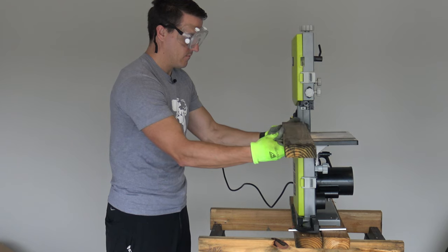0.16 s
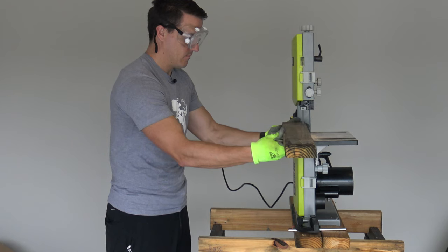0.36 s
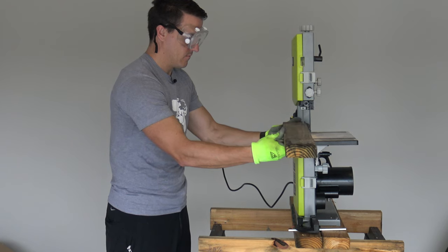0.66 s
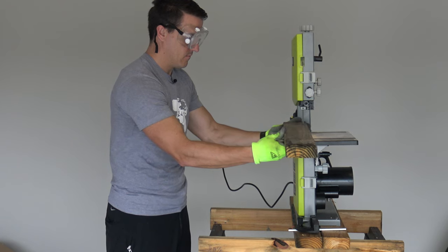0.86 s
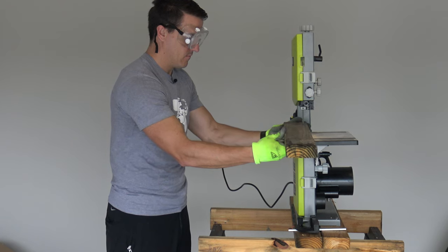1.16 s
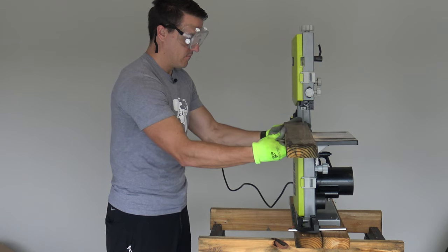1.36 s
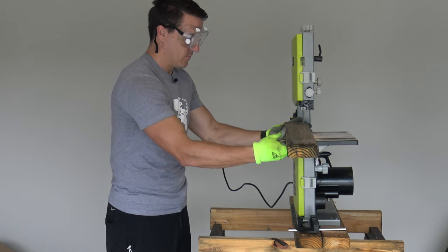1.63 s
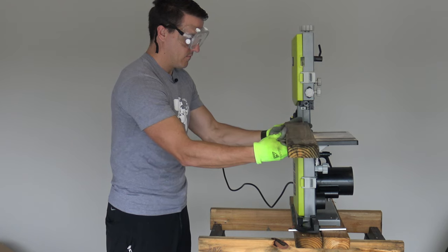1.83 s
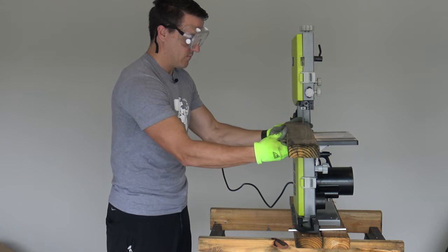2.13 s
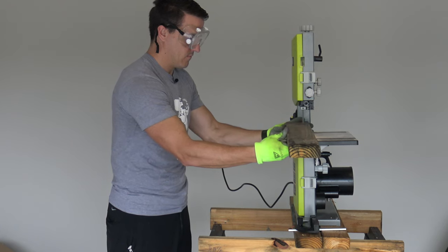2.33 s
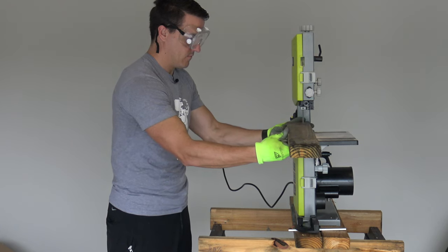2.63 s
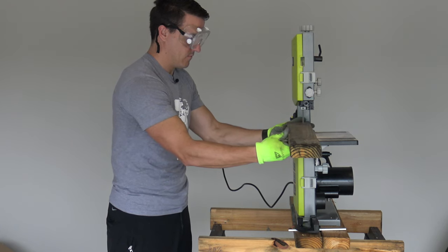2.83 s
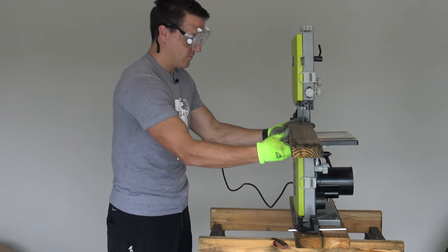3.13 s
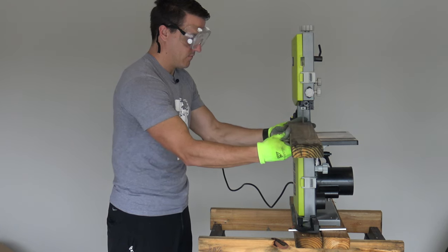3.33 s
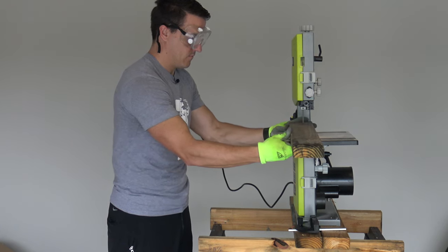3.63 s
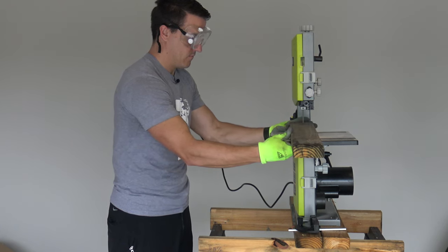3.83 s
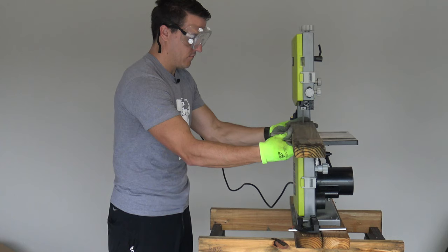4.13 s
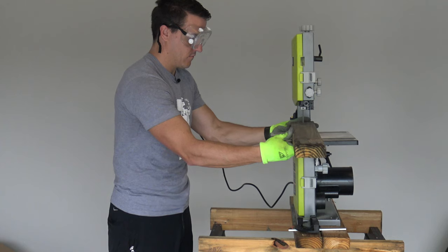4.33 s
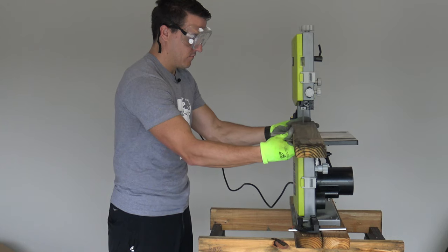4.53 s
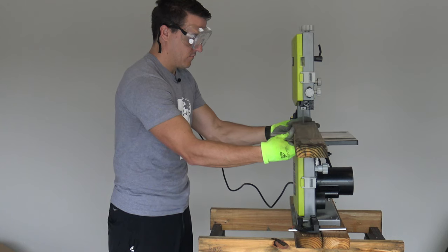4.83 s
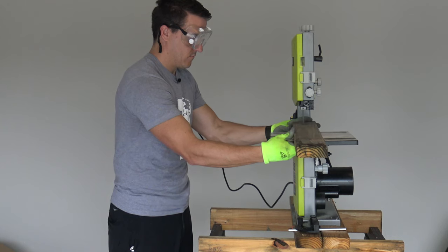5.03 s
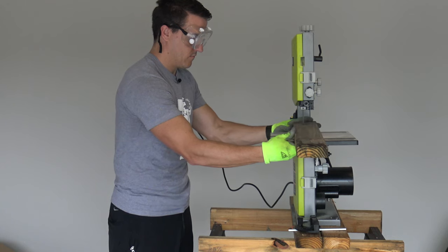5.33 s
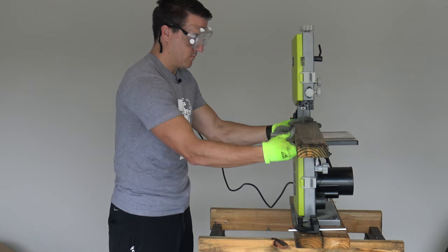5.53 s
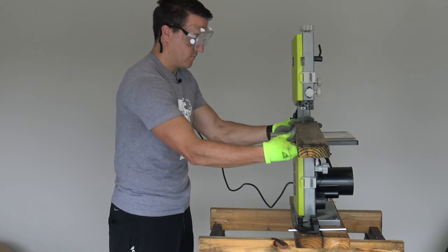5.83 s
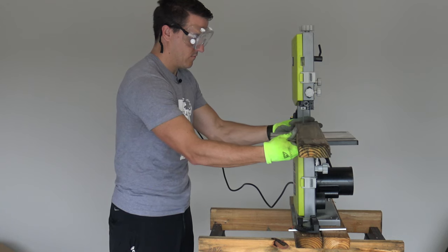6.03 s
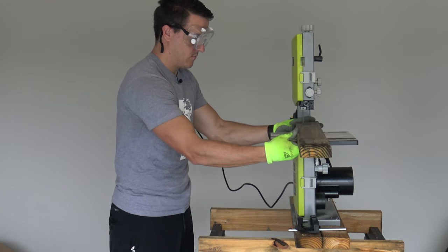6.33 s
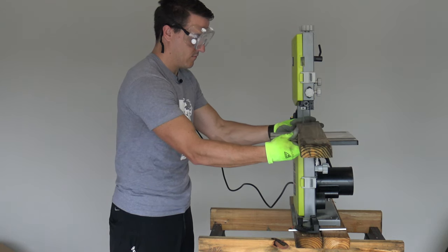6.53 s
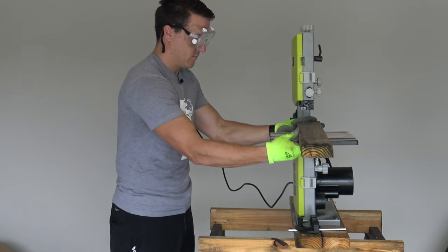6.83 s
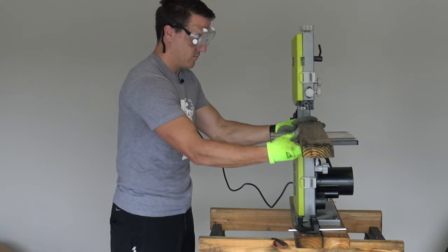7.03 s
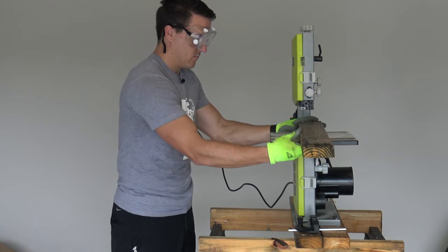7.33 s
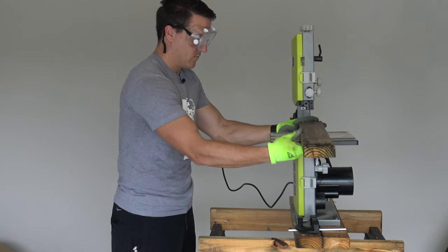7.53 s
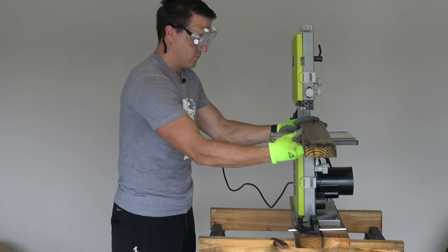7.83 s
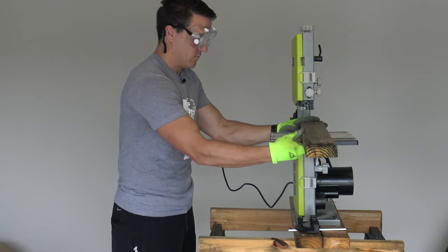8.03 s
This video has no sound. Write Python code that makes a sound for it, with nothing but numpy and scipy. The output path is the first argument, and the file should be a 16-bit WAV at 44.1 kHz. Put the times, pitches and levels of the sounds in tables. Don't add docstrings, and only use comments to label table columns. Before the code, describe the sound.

A small electric band saw is already cutting a thick plank at the start. A nasal, throbbing buzz of wood and a higher whine ride over a steady motor hum and a wide hiss of chips. Frequent shrill blade squeals fill the first two seconds, then thin out; the cut softens, with low wooden barks returning after six seconds. Close single microphone, bare room, short faint echo, same in both channels.

```python
import sys
import numpy as np
from scipy import signal
from scipy.fft import rfft, irfft
from scipy.io import wavfile

SR = 44100
rng = np.random.default_rng(int(sys.argv[2]) if len(sys.argv) > 2 else 0)


def file_out(sig):
    cols = np.atleast_2d(sig).T
    lim = np.clip(cols, -1, 1)
    pcm = np.round(lim * 32767).astype(np.int16)
    wavfile.write(sys.argv[1], SR, pcm)


def nominal_scale(level):
    x = np.asarray(level, float) / 20
    return 10 ** x


N = 360297
T = np.arange(N) / SR


def level(x, db):
    return x * nominal_scale(db) / np.sqrt(np.mean(x ** 2))


def curves(table):
    s, *columns = np.transpose(table)
    return [np.interp(T, s, c) for c in columns]


def bumps(events):
    t = T[::128]
    total_db = 0 * t
    for centre_s, length_s, db in events:
        total_db = total_db + db * np.exp(-((t - centre_s) / max(length_s, .01)) ** 2)
    return np.interp(T, t, total_db)


def walk(rate_hz):
    knots = rng.standard_normal(int(N / SR * 80) + 4)
    return 0.8 * np.interp(T * min(rate_hz, 80), np.arange(len(knots)), knots)


def ring(x, modes, flicker_db, rate_hz):
    out = np.zeros(N)
    for i, (hz, width_hz, db) in enumerate(modes):
        b, a = signal.iirpeak(hz, hz / (1.5 * max(width_hz, 5)), fs=SR)
        rung = signal.sosfilt([np.r_[b, a]] * 2, x)
        out += (-1) ** i * rung * nominal_scale(db + flicker_db * walk(rate_hz))
    return level(out, 0)


def colour(x, points):
    hz, db = np.transpose(points)
    f = np.arange(N // 2 + 1) * SR / N + 1
    return irfft(rfft(x) * nominal_scale(np.interp(np.log(f), np.log(hz), db)), N)


# multiple, level_db
SHAFT_MULTIPLES = [(5, -37.5), (6, -52), (7, -32.5), (8, -39), (9, -24.5), (10, -26.5), (11, -26),
                   (12, -58), (13, -10), (14, -9.5), (15, -3), (16, -42.5), (17, -9), (18, -11.5),
                   (19, -40.5), (20, -5.5), (21, 6), (22, -29), (23, -2.5), (24, -14), (25, -9), (26, -30),
                   (27, -29), (28, -9), (29, -3.5), (30, -20), (31, -13), (32, -15), (37, -12), (39, -12),
                   (43, -5), (48, -5), (55, -9)]


def motor(turns, hum_db):
    knock_turn, spread, bass_lag = .42, .3, .009
    top_db = dict(SHAFT_MULTIPLES)[21]
    out = np.zeros(N)
    for k, db in SHAFT_MULTIPLES:
        cycles = k * (turns - knock_turn) + spread * rng.random()
        cycles = cycles + bass_lag * min(k - 26, 0) ** 2 + 0.011 * walk(3.07)
        out += nominal_scale(db - top_db) * (1 + 0.19 * walk(7)) * np.sin(2 * np.pi * cycles)
    return np.sqrt(2) * nominal_scale(hum_db) * out


# time_s, level_db
FEED = [(0.0, -49.5), (0.04, -55), (0.43, -56), (1.07, -55.5), (1.34, -57), (1.71, -56), (1.77, -56.5),
        (3.77, -58.5), (4.19, -60), (4.32, -57), (5.05, -59), (5.19, -57), (5.69, -59.5), (7.37, -60),
        (7.6, -58.5), (8.17, -59)]
# time_s, level_db
BITE = [(0.0, -40.5), (0.48, -41.5), (0.59, -36.5), (1.02, -43), (1.43, -43.5), (1.55, -40.5), (1.77, -46),
        (1.84, -42), (1.95, -43.5), (2.18, -39.5), (2.23, -41), (2.68, -46), (3.12, -41), (3.18, -43.5),
        (5.03, -46.5), (5.44, -44.5), (5.6, -46.5), (8.17, -54)]
# time_s, level_db
CHATTER = [(0.0, -47), (0.11, -42), (1.73, -45.5), (2.77, -50), (3.41, -48), (3.5, -53), (3.55, -47),
           (4.19, -52.5), (4.35, -46), (5.69, -43), (6.24, -44), (6.28, -39), (6.62, -44.5), (7.05, -32.5),
           (7.17, -44), (8.17, -54.5)]
USUAL_DB = (-58, -45, -46)
# centre_s, length_s, change_db
PUSH = [(.09, 0.027, -1), (.17, 0.068, 1), (.48, 0.087, -1), (.6, 0.036, 0.5), (1.41, 0.055, -1),
        (1.52, 0.032, 1), (2.16, 0.069, 0.5), (2.76, .05, 0), (3.0, .04, 0.5), (4.36, 0.069, -1),
        (5.16, 0.012, -0.5), (6.9, 0.033, 0.5), (7.2, 0.059, -0.5), (7.58, 0.056, 0)]
# level_db, then shares of feed, bite and chatter, lean_db, drift_db_per_s as the cut deepens
PARTS = dict(low_modes=(-47.5, -0.4, 0.44, 0.11, 2, 0.02), main_modes=(-41, 1, -0.62, 0.5, -5, -0.54),
         upper_modes=(-49, 1.6, -0.44, 0.51, -3, 0), whine=(-42.5, .7, .1, -.45, 0, -1.5),
         low_ring=(-46.5, 1, 0.1, -0.18, 2, .5), middle_ring=(-49, 0, 0.51, 0.04, 5, -2.3),
         high_ring=(-43, 0.97, 1.25, 0.29, -2, 1), rasp=(-55, 1.91, 0.153, 0.1935, -0.1, 0.81),
         upper_guide=(-56.5, 1.39, -0.4, -0.32, 2, -0.46), lower_guide=(-76, -0.8, -0.96, -0.1, 8.5, -1.5))
# centre_s, length_s, change_db
SPELLS = dict(low_ring=[(1.11, 0.13, 9), (2.55, .15, 1), (3.1, 0.56, -3), (4.3, .06, -3), (4.66, 0.052, 3),
          (5.3, 0.39, 5.5), (6.5, 0.46, 2.5), (7.66, 0.2, 2.5), (7.95, 0.1, -8)],
          upper_guide=[(.2, 0.12, 2), (.4, 0.068, 3.5), (.62, 0.083, 3.5), (.95, 0.1, 1), (1.6, 0.13, 2),
          (5.3, .15, 2)], lower_guide=[(2.12, .2, 8), (3.58, .06, 6), (4.95, 0.18, 0), (6.92, .06, 4)],
          upper_modes=[(2.97, 0.26, 3), (6.14, 0.46, 6.5), (2.4, 0.069, 2)], low_modes=[(.5, 0.067, 2),
          (4.45, 0.16, 5.5), (4.85, 0.032, 9), (5.3, 0.06, -1), (6.38, .08, 4)],
          middle_ring=[(.1, 0.22, 5.5), (.35, 0.05, 3), (1.63, 0.039, 0), (2.64, .05, 0)],
          main_modes=[(.6, 0.076, 6), (4.9, 0.029, 4), (6.56, 0.043, 3), (6.74, 0.046, 0),
          (6.97, 0.03, 1.5), (7.02, .02, 1), (.52, 0.036, -6), (7.65, 0.075, 6.5)],
          high_ring=[(.97, 0.043, 8), (1.22, .04, 0), (6.4, .25, -1), (6.9, 0.082, -3.5), (7.8, .15, -4)])


def part_db(name, stray_db):
    feed, bite, chatter = (curves(c)[0] - db for c, db in zip((FEED, BITE, CHATTER), USUAL_DB))
    lean = np.interp(T, 4.13 + np.cumsum([0, 0.15, 1, 1]), [0, 1, 1, 0])
    db, of_feed, of_bite, of_chatter, lean_db, drift = PARTS[name]
    out = db + of_feed * (feed + bumps(PUSH)) + of_bite * bite + of_chatter * chatter
    out = out + lean_db * lean + drift * (T - T[-1] / 2)
    return out + bumps(SPELLS.get(name, [])) + stray_db * walk(6.4)


def throb(turns, lap_db, shaft_db, roller_db):
    lap = 2 * np.pi * 8.0 * T - 2.3
    shaft = 2 * np.pi * turns + .3
    roller = 2 * np.pi * 56.4 * T
    return nominal_scale(lap_db * np.cos(lap) + shaft_db * np.cos(shaft) + roller_db * np.cos(roller))


def bites(teeth, scatter_db, dust):
    out = dust * rng.standard_normal(N)
    at = np.flatnonzero(np.diff(np.floor(teeth)))
    chance = rng.standard_normal((len(at) + 200, 2))[:len(at)]
    out[at] += 6 * chance[:, 0] * nominal_scale(scatter_db * chance[:, 1])
    return level(out, 0)


# pitch_hz, width_hz, level_db
PLANK = [
    [(738, 22, 0), (768, 22, -1), (803, 22, -1), (822, 20, -5)],
    [(846, 24, 0), (876, 22, 0)],
    [(968, 14, 0), (1016, 24, -7), (935, 30, -10)],
]


def plank(bite, gains, turns):
    wood = sum(gain * ring(bite, modes, .8, 25) for gain, modes in zip(gains, PLANK))
    return nominal_scale(-3.0) * wood * throb(turns, 1.3, 1.2, .4)


# pitch_hz, width_hz, level_db
BLADE = [
    [(3850, 30, 2), (3910, 44, 0), (3990, 50, -4)],
    [(4250, 60, -1), (4320, 50, 0), (4380, 20, 2), (4490, 90, 0)],
    [(4645, 40, 2), (4705, 50, 2), (4790, 50, -1), (4940, 36, 2), (4995, 36, -4)],
]
# pitch_hz, width_hz, level_db
SING = [(4768, 8, 5), (4808, 24, 1), (4950, 50, -4)]


def blade(bite, gains, sing, turns):
    steel = sum(gain * nominal_scale(-2) * ring(bite, modes, 2, 50) for gain, modes in zip(gains, BLADE))
    steel += nominal_scale(0.5) * sing * ring(bite, SING, 1.3, 45)
    return nominal_scale(-4.5) * steel * throb(turns, 2.2, .8, .3)


WHINE_DB = [-10, -6, -18.5, -6, -6]


def tooth_whine(bite, whine, carriers, turns, teeth):
    out = nominal_scale(-8) * whine * ring(bite, [(1922, 36, 0), (1860, 50, -11), (2000, 60, -7)], 1.5, 30)
    pressure = throb(turns, 3.2, 1.8, 1.3)
    spacing = .07 * walk(60) + .085 * walk(16)
    for k, (carrier, db) in enumerate(zip(carriers, WHINE_DB), 1):
        gain = carrier * nominal_scale(db + 1.5 * walk(9) + 1.5 * walk(35))
        out += gain * pressure * np.sin(2 * np.pi * (k * teeth + spacing))
    return out


# centre_s, length_s, change_db
BLOOM = [(0, 0.017, 9), (.07, 0.036, -6), (.42, 0.068, -1), (.6, 0.044, 5.5), (1.2, 0.28, -1),
         (1.68, 0.081, 6), (2.06, 0.077, 2.5), (2.4, 0.034, 3), (2.64, 0.099, 3), (2.95, 0.2, 2),
         (3.85, 0.25, -1), (3.22, 0.27, 3), (3.5, 0.037, -3.5), (4.68, 0.19, 3.5), (5.04, 0.072, 0),
         (5.35, 0.23, 6), (6.6, 0.19, 6), (6.95, 0.11, -4), (7.44, 0.046, 8.5), (7.68, 0.11, 5),
         (8.12, 0.083, 6)]


def cutting(turns, teeth):
    board = [nominal_scale(part_db(name, 0.96)) for name in ("low_modes", "main_modes", "upper_modes")]
    steel = [nominal_scale(part_db(name, 0.29)) for name in ("low_ring", "middle_ring", "high_ring")]
    whine = nominal_scale(part_db("whine", 0.53) + bumps(BLOOM))
    sing = steel[2] * np.clip(steel[2] / nominal_scale(-43.5), .05, 1)
    bite = bites(teeth, scatter_db=0.5, dust=0.31)
    carriers = [board[2], whine, np.sqrt(whine * steel[0]), steel[0], sing]
    out = plank(bite, board, turns) + blade(bite, steel, sing, turns)
    return out + tooth_whine(bite, whine, carriers, turns, teeth)


# pitch_hz, level_db per Hz
CHIP_SPECTRUM = [(20, -42), (60, -37), (190, -11.5), (230, -9.5), (500, -2), (1130, -1.5), (1800, -1),
                 (2750, -5), (4600, -2), (5200, -6.5), (7900, -16.5), (10200, -13.5), (13200, -25),
                 (15700, -31)]


def chip_hiss(chips, feed_db):
    return nominal_scale(feed_db + 13.0) * level(colour(chips, CHIP_SPECTRUM), 0)


FRAME_HZ = [625, 1110, 1180, 1330, 1388, 1442, 1610, 1745, 1975, 2075, 2305, 2620, 2894, 3210, 3450, 5650,
            5820, 6185, 6350, 6750, 7320, 10500]
# width_hz, level_db
FRAME_MODES = [(19.8, -5.5), (20, -32), (34.8, -13.5), (25, -2.5), (20.6, -9), (19.7, -0.5), (74, -6),
               (83, -2), (49.3, -6.5), (40, -24), (45, -8.5), (90, -12.5), (10, 0), (60, -15), (85.6, -8.5),
               (220, -8.5), (200, -7.5), (70, -39), (239, -12.5), (112, -15.5), (226, -21.5), (150, -36)]


def frame(scrape, feed_db):
    modes = [(hz, *mode) for hz, mode in zip(FRAME_HZ, FRAME_MODES)]
    return nominal_scale(feed_db + 11) * ring(scrape, modes, 1.6, 7)


# pitch_hz, width_hz, level_db
GUIDES = [
    [(11020, 90, -5), (11350, 200, -8), (11610, 110, 1), (11990, 140, 0)],
    [(14380, 240, 0), (14750, 300, -5), (15250, 340, -5)],
]


def guides(scrape):
    upper_db, lower_db = part_db("upper_guide", 0.18), part_db("lower_guide", .6)
    upper = nominal_scale(2.2 * (upper_db + 53) - 60) * ring(scrape, GUIDES[0], 4.5, 40)
    lower = nominal_scale(1.6 * (lower_db + 67.5) - 63) * ring(scrape, GUIDES[1], 4.5, 40)
    return upper + lower


def catches(events, swell_s, db, late_s=0.0):
    t = np.arange(-.015, .05, 1 / SR)
    bell = np.exp(-(t / (swell_s * np.where(t < 0, .75, 1.3))) ** 2)
    tail = (t > 0) * 0.59 * np.exp(-t / (3 * swell_s))
    shape = np.maximum(bell, tail)
    out = np.zeros(N + len(t))
    for s, peak_db, hz in events:
        i = int((s + late_s + t[0]) * SR)
        out[i:i + len(t)] += nominal_scale(peak_db + db) * shape * np.sin(2 * np.pi * hz * t)
    return out[:N]


# peak_s, peak_db, pitch_hz
PLANK_CATCH = [(0.185, -27, 840), (0.217, -27, 850), (0.335, -25, 863), (0.358, -25, 860),
               (0.586, -38, 835), (0.645, -30, 885), (0.68, -34, 840.0), (0.726, -35, 830),
               (0.882, -28, 858), (1.01, -31, 825), (1.078, -24, 850), (1.117, -31, 875), (1.419, -29, 820),
               (1.49, -22.5, 842), (1.545, -26.5, 833), (1.666, -24, 857), (2.453, -32, 886),
               (2.965, -33, 816), (3.104, -30.5, 825), (3.19, -30, 842), (3.317, -29, 845),
               (3.396, -38, 860), (3.733, -27, 850), (4.392, -32, 860), (4.638, -29, 850),
               (4.891, -26, 830), (4.903, -30, 750), (5.18, -30, 836), (5.329, -32, 850),
               (6.121, -28.5, 884), (6.166, -30, 880), (6.247, -26, 900), (6.28, -23, 890),
               (6.291, -30, 904), (6.305, -22, 854), (6.354, -27, 877), (6.379, -28.7, 847),
               (6.445, -25, 790), (6.463, -23, 851), (6.64, -26.5, 886), (6.82, -21.5, 870),
               (6.89, -23.5, 864), (6.913, -39, 860), (6.929, -28.5, 880), (7.062, -19.5, 860),
               (7.125, -25, 880.0), (7.299, -28.5, 892), (7.536, -36, 880), (7.846, -27, 890.0),
               (7.896, -34, 815)]
# peak_s, peak_db, pitch_hz
BLADE_CATCH = [(0.178, -34, 3900), (0.187, -35, 4000), (0.351, -35.4, 3950), (0.643, -34, 3900),
               (0.669, -26.5, 3890), (0.689, -44, 3840), (1.029, -37, 4050), (1.058, -37, 3910.0),
               (1.073, -40, 3920), (1.086, -29, 3880.0), (1.098, -30, 3860), (1.113, -40, 3750),
               (1.154, -40, 3920), (1.169, -33.5, 3800), (1.634, -36.1, 3750), (1.655, -35.6, 3850),
               (1.998, -34.5, 3950), (2.181, -31, 3870), (2.425, -29, 3890), (2.54, -38, 3900),
               (2.622, -35, 3860), (2.748, -34, 3900), (4.243, -31, 3900), (4.262, -31.5, 3820),
               (4.31, -25, 3860), (4.37, -32, 3930), (4.527, -37, 3880), (4.668, -29, 3860),
               (5.234, -41, 3930), (5.358, -30.5, 3900), (5.44, -32.5, 3860.0), (6.019, -37, 4070),
               (7.568, -46, 3920), (7.2, -43, 4660), (7.627, -34.7, 3980), (7.676, -52, 3820),
               (7.783, -48, 3800)]
# peak_s, peak_db, pitch_hz
SIDE_CATCH = [(0.055, -30, 4360), (0.12, -30, 4320), (0.129, -26.5, 4260), (0.295, -34, 4470),
              (0.348, -31, 4340), (0.425, -39, 4400), (0.638, -32, 4380.0), (0.684, -38, 4460),
              (0.781, -32.7, 4530), (1.005, -33.6, 4360), (1.06, -36, 4300), (1.618, -31, 4360),
              (1.634, -37, 4400), (1.646, -31, 4450), (2.615, -33, 4330.0), (2.671, -33, 4400)]
# peak_s, peak_db, pitch_hz
SQUEAL = [(0.141, -26.0, 4830.0), (0.26, -29.1, 4860.0), (0.296, -28.9, 4770.0), (0.357, -31.6, 4880.0),
          (0.422, -29.4, 4780.0), (0.527, -27.8, 4770.0), (0.538, -27.0, 4810.0), (0.581, -28.2, 4810.0),
          (0.598, -24.4, 4820.0), (0.625, -23.6, 4770.0), (0.647, -27.2, 4780.0), (0.665, -28.0, 4810.0),
          (0.681, -28.1, 4790.0), (0.734, -26.1, 4800.0), (0.77, -26.4, 4800.0), (0.78, -27.7, 4800.0),
          (0.805, -26.0, 4810.0), (0.824, -21.2, 4770.0), (0.951, -21.2, 4810.0), (0.973, -27.8, 4760.0),
          (1.002, -25.1, 4780.0), (1.041, -21.8, 4830.0), (1.06, -31.1, 4780.0), (1.127, -29.7, 4850.0),
          (1.18, -27.9, 4810.0), (1.298, -29.2, 4890.0), (1.315, -25.1, 4810.0), (1.495, -31.5, 4750.0),
          (1.551, -27.7, 4800.0), (1.576, -29.4, 4810.0), (1.634, -25.1, 4800.0), (1.65, -29.3, 4840.0),
          (1.837, -29.8, 4840.0), (1.849, -29.3, 4790.0), (1.901, -30.1, 4780.0), (2.131, -26.5, 4770.0),
          (2.148, -31.4, 4780.0), (2.169, -27.7, 4780.0), (2.189, -26.9, 4810.0), (2.319, -32.1, 4840.0),
          (2.985, -29.4, 4810.0), (3.002, -33.4, 4770.0), (3.094, -29.1, 4780.0), (3.124, -29.1, 4770.0),
          (3.392, -30.1, 4770.0), (3.571, -29.3, 4750.0), (4.64, -35.0, 4810.0), (5.189, -35.3, 4780.0),
          (5.203, -34.8, 4710.0), (5.422, -32.5, 4800.0)]
# start_s, peak_db, pitch_hz
GUIDE_TICK = [(0.1151, -45, 11600), (0.1266, -39, 11700), (0.156, -33, 11700), (0.1785, -33, 11900),
              (0.2054, -41, 11700), (0.2274, -38, 11700), (0.2633, -42, 12000), (0.2967, -44, 11600),
              (0.3022, -42, 12000), (0.3491, -42, 11600), (0.3726, -47, 11600), (0.4035, -42, 11600),
              (0.5452, -46, 12000), (0.5841, -43, 11500), (0.6973, -46, 12000), (0.7462, -46, 11600),
              (0.9153, -45, 12000), (1.4845, -50, 10300), (1.4845, -48, 12000), (1.5194, -48, 10300),
              (1.5194, -44, 11000), (1.6247, -46, 11900), (1.6511, -43, 10500), (1.703, -45, 11800)]
# peak_s, peak_db, pitch_hz
WHINE_CATCH = [(.12, -31, 1930), (.162, -26, 1925), (.2, -29, 1920), (.288, -34, 1925), (.338, -28, 1930),
               (.603, -24, 1930), (.655, -30, 1930), (1.66, -29, 1922), (1.775, -33, 1922),
               (2.075, -33, 1925), (2.18, -33, 1922), (2.398, -33, 1922), (2.962, -29, 1920),
               (3.515, -36, 1915), (3.69, -36, 1918), (4.17, -37, 1920), (4.76, -37, 1915),
               (4.885, -36, 1915)]
# start_s, peak_db, pitch_hz
CHIRP = [(7.099, -47, 6610), (7.1229, -45, 6650), (7.2861, -55, 6690), (7.3749, -47, 6710),
         (7.4063, -44, 6760), (7.5804, -38, 6780), (7.6213, -43, 6700), (7.8403, -41, 6760)]


def snags():
    out = catches(PLANK_CATCH, 0.0073, -5)
    out += catches(BLADE_CATCH, 0.0056, -1.6) + catches(SIDE_CATCH, 0.0056, -1.6)
    out += catches(SQUEAL, 0.004, -1.2)
    out += catches(np.array(SQUEAL) + [0, 0, 166], .005, -7.5, .003)
    out += catches(GUIDE_TICK, .004, -1.6, .0045)
    out += catches(WHINE_CATCH, 0.0066, -4)
    return out + catches(CHIRP, 0.0074, -1.5, 0.0051)


# centre_s,
# length_s, level_db, pitch_hz
PANEL_HUM = [(5.25, .05, -56, 1330), (7.75, 0.12, -58, 1440), (7.3, .9, -59, 2305), (4.58, .04, -58, 2890),
             (1.2, 0.9, -64, 10520), (0.96, .2, -56, 2400), (2.1, 0.2, -56, 2895), (7.76, 0.32, -58, 1170)]


def panels(scrape):
    out = np.zeros(N)
    for s, length_s, db, hz in PANEL_HUM:
        swell = np.exp(-((T - s) / length_s) ** 2)
        out += nominal_scale(db) * swell * ring(scrape, [(hz, 8 + hz / 90, 0)], 2.5, 25)
    return out


def rasp(turns, teeth):
    feed_db = part_db("rasp", 0.51)
    pressure = throb(turns, 0.29, 0.55, 0.87) * nominal_scale(1.0 * walk(14))
    chips, scrape = (pressure * bites(teeth, scatter_db=1.2, dust=1.7) for _ in range(2))
    return chip_hiss(chips, feed_db) + frame(scrape, feed_db) + guides(scrape) + panels(scrape)


# time_s, level_db
HUM = [(0.0, -37), (0.04, -43.5), (0.23, -43), (1.27, -44), (4.21, -51), (4.43, -46.5), (5.48, -46.5),
       (5.55, -47), (7.33, -51.5), (7.74, -48.5), (8.15, -49.5), (8.17, -54)]
# time_s, rate_hz
SHAFT_HZ = [(0, 16.87), (.3, 16.83), (1.2, 16.81), (1.8, 16.77), (8.2, 16.77)]
# time_s, rate_hz
TOOTH_HZ = [(0, 963.5), (1.4, 963), (3, 960.5), (4.8, 960), (8.2, 958)]


def scene():
    turns, teeth = (np.cumsum(curves(rate)[0]) / SR for rate in (SHAFT_HZ, TOOTH_HZ))
    near = cutting(turns, teeth) + rasp(turns, teeth) + snags()
    t = T[:SR // 2]
    decay = np.exp(-np.log(1000) * t / 0.26)
    echo = level(rng.standard_normal(len(t)) * decay, 0) / np.sqrt(len(t))
    mono = near + nominal_scale(-16) * signal.fftconvolve(near, echo)[:N] + motor(turns, curves(HUM)[0])
    return np.array([mono, mono]) * np.clip(T / .004, 0, 1)


def roll_off(x):
    return signal.sosfilt(signal.butter(12, 15700, fs=SR, output="sos"), x)


def record(dry):
    return roll_off(dry)


dry = scene()
out = record(dry)
file_out(out)
```